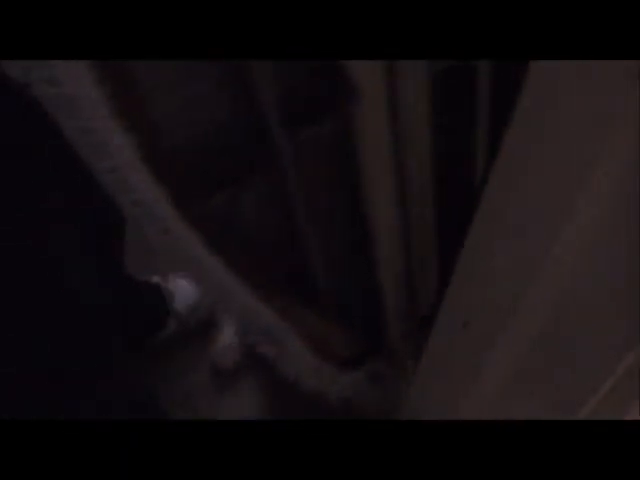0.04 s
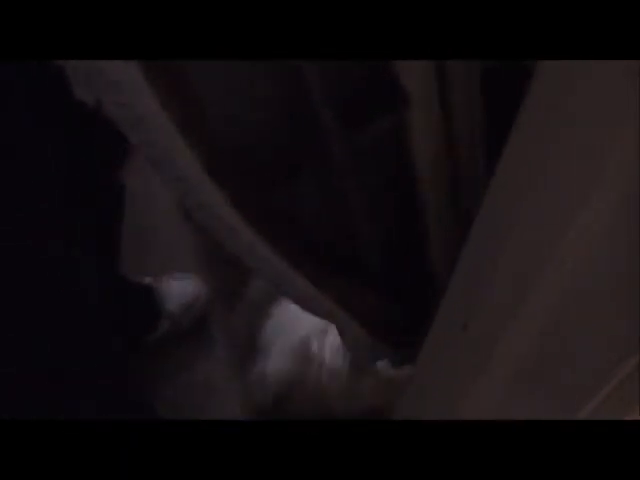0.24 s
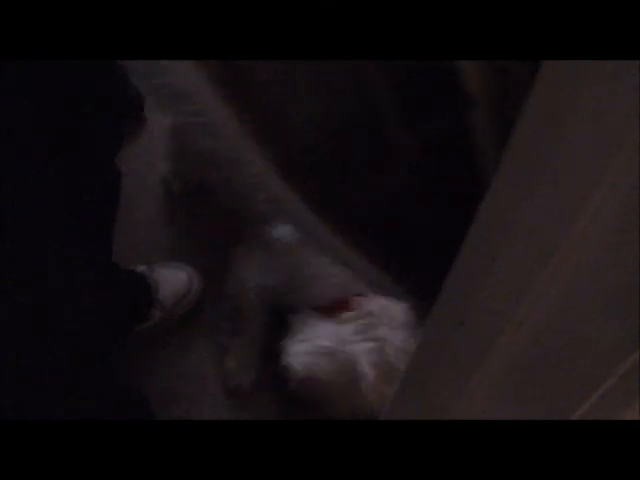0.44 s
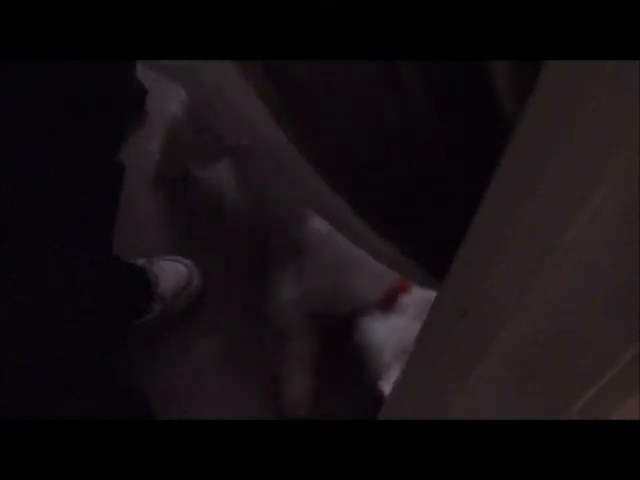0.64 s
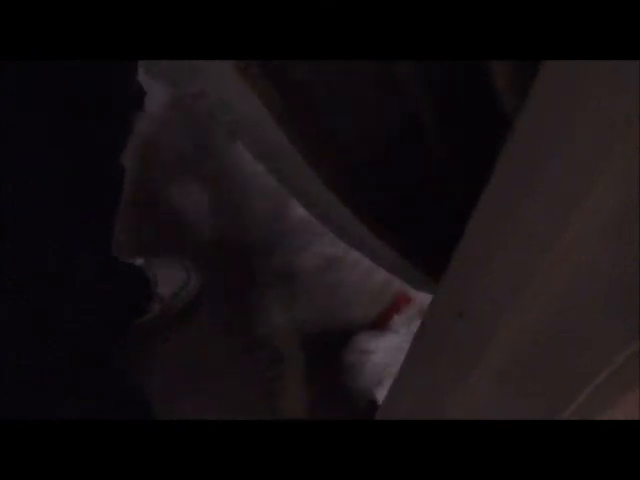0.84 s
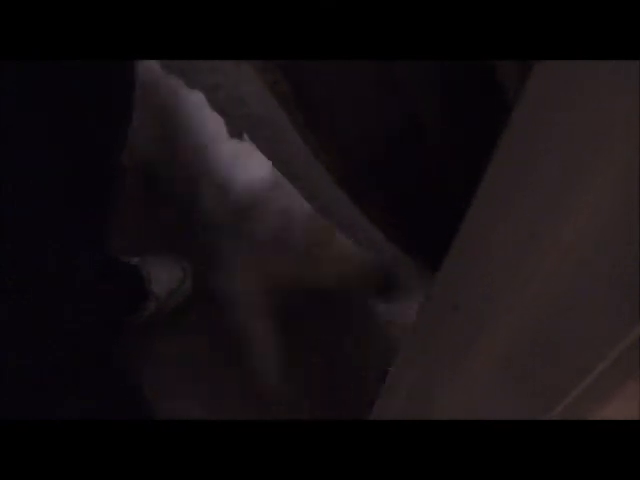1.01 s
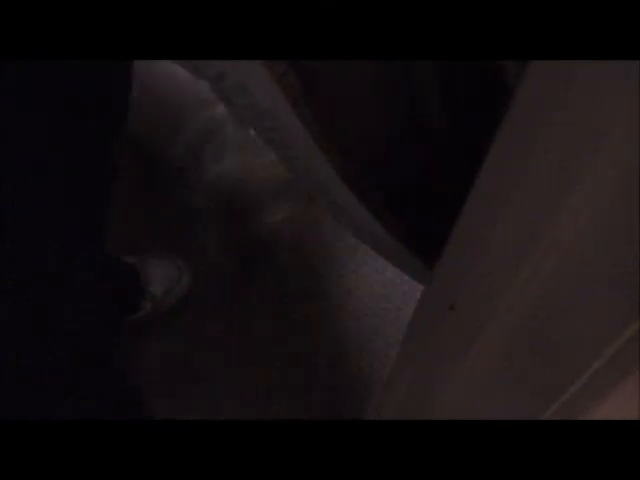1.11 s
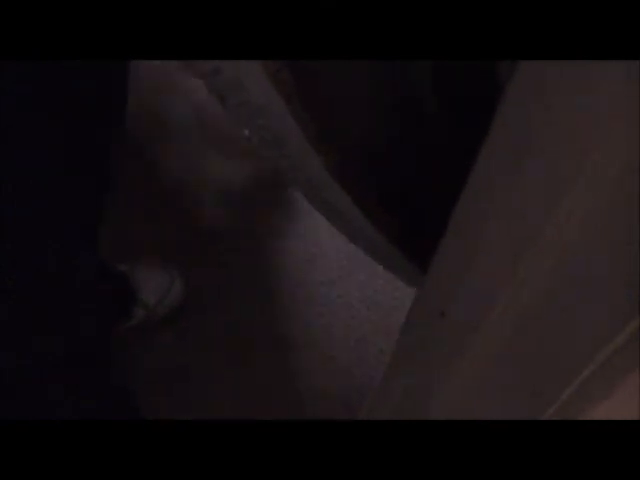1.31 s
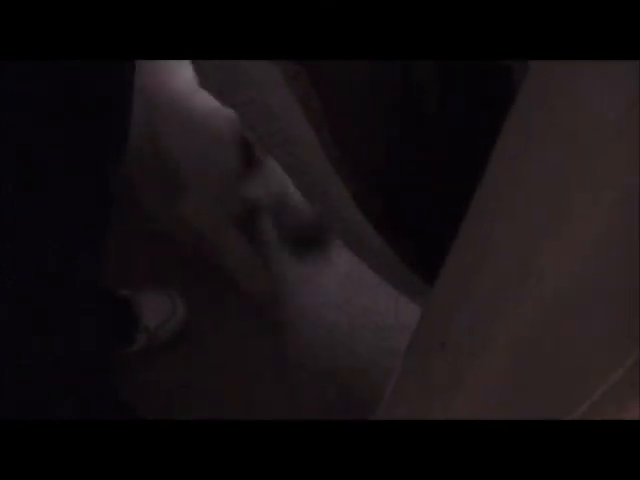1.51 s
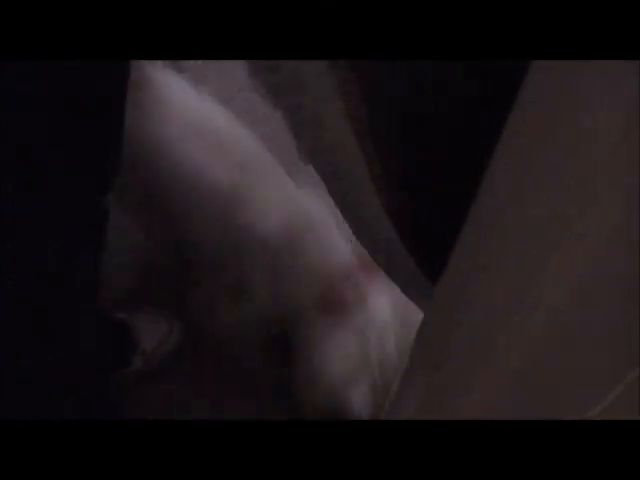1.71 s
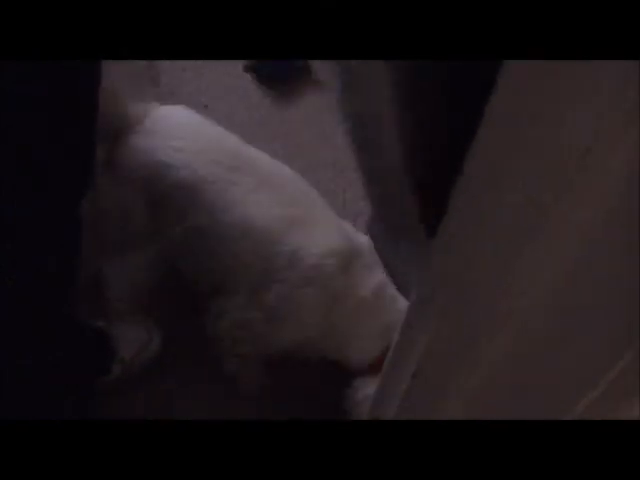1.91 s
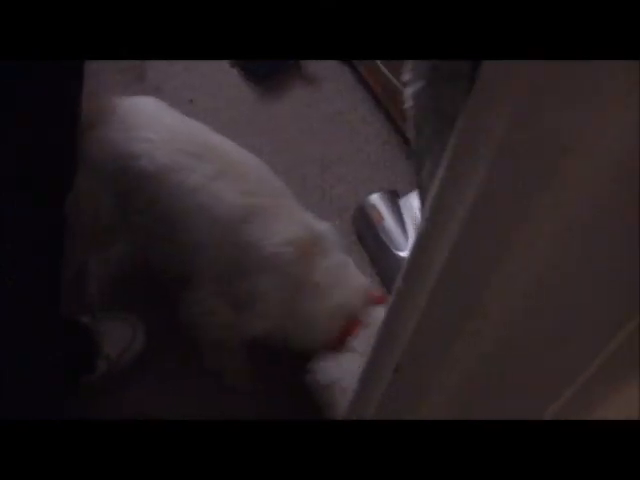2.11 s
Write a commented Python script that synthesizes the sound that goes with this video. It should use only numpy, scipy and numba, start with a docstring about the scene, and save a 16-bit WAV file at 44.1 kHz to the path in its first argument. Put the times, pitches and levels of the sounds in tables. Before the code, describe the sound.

A small dog growls, barks gruffly twice, then snarls raggedly while knocking and snapping at a board

```python
"""Small dog snarling in a small room

A small dog growls, breaks into two gruff barks, then into a long ragged snarl: pulses and rasping
air from the vocal folds ring through chest, throat and mouth, and air hisses through the teeth.
Once in the growl, then between the calls and after the last, it snaps and scrabbles at a board:
noise bursts knock the wood and crack at the contact, and two close tones ring on as a thin metal
part. A close microphone pair hears the near walls and a faint room tone."""
import sys
import numpy as np
from scipy import signal
from scipy.fft import rfft, irfft
from scipy.io import wavfile
from scipy.ndimage import uniform_filter1d, minimum_filter1d, map_coordinates
from numba import njit

SR = 44100
rng = np.random.default_rng(int(sys.argv[2]) if len(sys.argv) > 2 else 0)


def digitize_waveform(pressure):
    """Quantize a signal to 16-bit integers and store it at the path in sys.argv[1].

    Rows of a 2-D input are taken as channels; values are limited to [-1, 1].
    """
    field = np.atleast_2d(pressure).T
    bounded = np.clip(field, -1, 1)
    quanta = np.round(bounded * 32767).astype(np.int16)
    wavfile.write(sys.argv[1], SR, quanta)


N = 94815
T = np.arange(N) / SR  # seconds

# Noise of the quiet room. Each row: frequency in Hz, relative level in dB.
ROOM_TONE = [(25, -4), (55, -13), (90, -31), (160, -10.5), (400, -11.5), (1000, -14), (4000, -19),
             (15000, -32)]
ROOM_TONE_DB = -54

# The vocal folds. Each row: time in seconds, mean pitch in Hz, roughness from 0 to 1.
FOLDS = [(0, 227.6, 0.24), (.035, 268.9, 0.19), (.1, 250.3, 0.06), (.19, 259.2, 0.23), (.225, 298.4, .5),
         (.245, 380.9, 0), (.265, 399.8, 0.02), (.315, 368.6, 0.25), (.36, 261.5, 0.97), (.42, 279.1, 0.37),
         (.5, 297.8, 0.15), (.53, 307.3, 0.49), (.545, 383.2, 0.51), (.565, 441.8, 0.56),
         (.59, 481.6, 0.43), (.615, 588.7, 0.01), (.64, 556, 0.2), (.662, 497, 0.19), (.68, 319.3, 0.98),
         (.75, 208.6, 0.69), (1.14, 288.9, 0.93), (1.165, 314.4, 0.47), (1.19, 386.6, 0.48),
         (1.22, 403, 0.89), (1.245, 490.3, 0.66), (1.275, 526.8, 0.3), (1.298, 533.1, 0.35),
         (1.31, 393, 0.23), (1.33, 378.9, 0.21), (1.355, 343.8, 0.74), (1.41, 354.4, 0.83),
         (1.45, 342.3, 0.93), (1.48, 412.3, 0.32), (1.505, 471.5, 0.56), (1.53, 428.5, 0.91),
         (1.565, 371, 0.45), (1.6, 303.5, 0.99), (1.67, 307.4, 0.6), (1.71, 228.7, 0.69),
         (1.76, 189.8, 0.69)]
# All of these grow with roughness; rates are random points per second.
JITTER, FLUTTER_HZ, WOBBLE, WOBBLE_HZ = 0.07582, 219.1, .03, 70.49  # fast and slower pitch unrest
SHIMMER, HALF_TONE, RASP = 0.81, 0.34, 2  # pulse size unrest, octave-down beat, share of air
SECOND_FOLD, SECOND_RATIO = 0.41, 1.27  # share of the second fold, its pitch over the first
THROB_DB, THROB_HZ = 0.5, 74.4  # uneven loudness

# Growl and barks. Each row: time in seconds, then levels in dB, before the trims below, of the
# throat, the upper mouth, the low chest tone and the hiss.
BARKS = [(0.0, -26.5, -41, -25, -46), (0.01, -28.5, -46, -50, -61), (0.04, -24.5, -43, -32, -51),
         (0.1, -44, -49, -33.5, -56), (0.11, -31.5, -34.5, -36.5, -51), (0.142, -36.5, -55.5, -31.5, -56),
         (0.204, -38.5, -47.5, -35, -46), (0.232, -19, -30.5, -45, -45.5), (0.25, -14.5, -17.5, -31, -43.5),
         (0.274, -12.5, -27.5, -27, -53), (0.304, -28, -19, -35.5, -48), (0.338, -27.5, -59, -38, -48),
         (0.454, -31.5, -41, -30.5, -55), (0.49, -26.5, -37.5, -30, -55), (0.54, -23.5, -28.5, -28.5, -46),
         (0.566, -17.5, -13.5, -40.5, -40), (0.586, -15.5, -11, -77, -36), (0.596, -12.5, -16.5, -14, -34),
         (0.612, -14.5, -21.5, -74, -64), (0.628, -22.5, -37.5, -46, -51), (0.664, -16.5, -24.5, -24, -59),
         (0.688, -35.5, -50, -43.5, -52), (0.704, -45, -64, -31, -70), (0.712, -52, -57, -27.5, -56),
         (0.728, -65, -67, -45, -63), (0.8, -81, -79, -68, -61)]
# The long snarl. Each row: the same columns, in seconds and dB.
SNARL = [(1.12, -79, -98, -66, -80), (1.152, -29, -32, -57, -69), (1.166, -29, -38.5, -37.5, -54),
         (1.21, -18.5, -38.5, -35.5, -47.5), (1.238, -15.5, -28.5, -45, -46), (1.252, -37, -20, -43, -43),
         (1.288, -20, -22.5, -65, -54), (1.306, -20, -46, -36, -50.5), (1.33, -10.5, -21, -34.5, -49),
         (1.362, -28.5, -28, -42.5, -46.5), (1.39, -20, -27.5, -52, -49), (1.406, -20, -24, -64, -41),
         (1.44, -21, -45.5, -36.5, -49), (1.472, -18, -22, -60, -44), (1.488, -20.5, -20.5, -40, -42.5),
         (1.518, -20.5, -25, -49, -43), (1.554, -13, -35, -34, -46), (1.574, -14.5, -21.5, -57, -45.5),
         (1.614, -27, -34.5, -43.5, -49.5), (1.688, -26, -37, -41, -52.5), (1.736, -43, -43.5, -42, -50),
         (1.77, -65, -55, -73, -56)]
PAUSE_TIMES_S, PAUSE_DB = (.83, 1.1, 1.83), -85  # the voice falls nearly silent
THROAT_DB, MOUTH_DB, CHEST_DB, HISS_DB = -2.5, 0.5, -2.5, -0.5  # trims
# Jaw and lips. Each row: time in seconds, throat resonance in Hz, lip resonance in Hz.
JAW = [(0, 890, 1420), (.04, 1160, 1320), (.11, 1060, 1780), (.17, 920, 1360), (.225, 940, 1500),
       (.26, 1090, 2050), (.3, 890, 2024), (.33, 810, 1820), (.39, 1040, 1300), (.47, 864, 1410),
       (.55, 920, 1813), (.6, 1060, 1817), (.635, 660, 1840), (.67, 717, 1786), (.72, 686.3, 1760),
       (1.15, 726.6, 1640), (1.23, 930, 1430), (1.28, 696, 2020), (1.33, 765, 1440), (1.41, 906, 1709),
       (1.45, 710, 1600), (1.495, 1198, 1620), (1.525, 884.6, 1440), (1.57, 983.4, 1611), (1.62, 884, 1618),
       (1.76, 890.7, 1450)]
# Upper mouth resonances. Each row: frequency in Hz, width of one pass in Hz, level in dB before opening.
MOUTH = [(1577, 310, 3.5), (1918, 770, -5), (2482, 355, -4.5), (2870, 740, -15.5)]
OPEN_DB_PER_DB, OPEN_FROM_DB = 0.11, -48  # tilt per octave above the lowest, growing with mouth level
# Widths are of one pass; each resonance is applied twice.
THROAT_WIDTH_HZ, LIP_WIDTH_HZ, LIP_DB = 566, 465, 4
PHARYNX_HZ, PHARYNX_WIDTH_HZ, PHARYNX_DB = 583, 111, -6.5
CHEST_HZ, CHEST_WIDTH_HZ = 312.5, 141
# Skirts of the throat. Each row: frequency in Hz, gain in dB.
THROAT_SKIRTS = [(120, -30), (250, 2.5), (380, -11), (520, -2), (1400, 3), (3000, -15.5), (6000, 1)]
# Skirts of the mouth. Each row: frequency in Hz, gain in dB.
MOUTH_SKIRTS = [(300, -27), (1000, -41), (1500, 2.5), (3000, 7), (4200, -7), (9000, 11)]
# Air through the teeth. Each row: frequency in Hz, relative level in dB.
HISS = [(2500, -18.5), (4000, 1.5), (5500, 1), (7500, 0.5), (10000, -6), (15000, -10.5)]

# Blows on the board. Each row: start in seconds, wood level in dB and sharp crack level in dB,
# both before the trims, rise time in seconds, scrape decay in seconds.
KNOCKS = [(0.188, -32.5, -33, 0.0026, .012), (0.839, -30, -37.5, 0.0072, 0.019),
          (.86, -35, -21, 0.00033, 0.019), (.886, -49, -31, 0.00096, 0.0044),
          (.921, -24.5, -19, 0.00036, 0.0076), (1.018, -36, -55, 0.0018, 0.0081),
          (1.0717, -77, -40, 0.00028, 0.0038), (1.778, -114, -34.5, .0004, 0.0072),
          (1.8384, -28.5, -25.5, 0.00024, 0.0073), (1.8544, -25.5, -24, 0.00028, 0.0086),
          (1.867, -27, -32, .003, 0.021), (1.889, -25.5, -21.5, 0.00037, 0.0018),
          (1.905, -34, -39, .001, 0.0088), (1.918, -32.5, -52, 0.00081, 0.005),
          (1.966, -38, -43, 0.0045, 0.0098), (2.0835, -29, -32.5, 0.00046, .007),
          (2.115, -35.5, -62, 0.014, 0.017), (2.143, -51, -62, 0.00079, .01)]
# Modes of the board. Each row: frequency in Hz, width in Hz, relative level in dB.
BOARD_MODES = [(154, 29.3, -9), (359.1, 88, 3.5), (491, 150, 4), (672, 330, 1), (907, 180, 4),
               (1580, 420, -0.5), (2450, 1070, -6.5), (3780, 330, -4.5)]
# Colour of the crack. Each row: frequency in Hz, relative level in dB.
CRACK = [(800, -9), (2300, 11), (3600, 5), (4800, 5.5), (7500, 7), (11000, 1), (15500, -3)]
WOOD_DB, CRACK_DB, GRAIN = 3, -3.5, 0.19  # two trims, depth of the grain in the scrape
RING_HZ, RING_DB, RING_PAIR_DB, RING_T60_S = (5426, 5383), -31, -6, .65  # second tone rel. to first

# Ringing resonances of the room. Each row: frequency in Hz, width in Hz, level in dB.
ROOM_MODES = [(279.2, 7.3, -6), (382.4, 9.3, -9.5), (502, 40, -7), (601.2, 26.4, 2.5), (651, 24.8, 6),
              (772, 16, -7), (885, 19, -5.5), (1140, 8.6, -15), (1375, 50, 1), (1802, 24, -15.5),
              (1910, 58, -13)]
ROOM_T60_S, ROOM_TREBLE_T60_S, ROOM_DB = 0.27, 0.17, -8
WALL_S = 0.00371  # delay before the first reflection
# Side sound from the reflections. Each row: frequency in Hz, level in dB.
SPREAD = [(100, -57), (1000, -28.5), (2500, -11), (5000, -8), (15000, -13.5)]
# Where the dog sits between the microphones. Each row: frequency in Hz, left minus right in dB.
DOG_PAN = [(200, -4), (700, -5), (1400, -4), (2500, -0.5), (5000, 5), (15000, 1.5)]
# Where the board stands. Each row: frequency in Hz, left minus right in dB.
BOARD_PAN = [(200, -5.5), (1000, -4.5), (2500, -1.5), (5000, 3), (15000, 1.5)]
RIGHT_LAG_S = .000012  # the left microphone hears first
CEILING, TOP_HZ = .93, 15500  # limiter ceiling (1 is full scale), top of the recorder's band


def undb(db):
    """Decibels to amplitude."""
    return 10 ** (np.asarray(db) / 20)


def unit(x):
    """Scale to an RMS of one."""
    return x / np.sqrt(np.mean(x ** 2))


def steady(x, size=900):
    """Hold a sound at unit level, following its power over tens of milliseconds."""
    power = uniform_filter1d(uniform_filter1d(x * x, size), size)
    return x / np.sqrt(np.abs(power) + 1e-12)


def curves(rows):
    """Join each column of a table by straight lines in time."""
    when, *columns = np.array(rows, float).T
    return [np.interp(T, when, column) for column in columns]


def colour(x, points, power=1):
    """Filter by a (Hz, dB) table, with power scaling the dB."""
    hz, db = np.array(points, float).T
    f = np.maximum(np.arange(N + 1) * SR / (2 * N), 1)
    gain = undb(power * np.interp(np.log(f), np.log(hz), db))
    return irfft(rfft(x, 2 * N) * gain)[..., :N]


def walk(rate):
    """Join random values, rate of them per second, by straight lines."""
    return np.interp(T * rate, np.arange(N), rng.standard_normal(N))


@njit
def svf(x, hz, width):
    """State-variable band-pass with a moving centre."""
    y, b, l = np.empty(len(x)), 0., 0.
    for i in range(len(x)):
        g = np.tan(np.pi * hz[i] / SR)
        v = (b + g * (x[i] + 1e-18 - l)) / (1 + g * (g + width / hz[i]))
        b, l, y[i] = 2 * v - b, l + 2 * g * v, v * width / hz[i]
    return y


def band(x, hz, width):
    """One resonance, fixed or moving."""
    return svf(x, hz + np.zeros(N), float(width))


def steep(x, hz, width):
    """A resonance applied twice, for steeper skirts."""
    return band(band(x, hz, width), hz, width)


def room_tone():
    """Steady coloured noise, partly shared by the two microphones."""
    shared = rng.standard_normal(N)
    separate = rng.standard_normal((2, N))
    return undb(ROOM_TONE_DB) * unit(colour(shared + separate, ROOM_TONE))


def fold_phase(hz, rough):
    """Running phase of a fold whose pitch grows unsteady with roughness."""
    flutter = JITTER * rough * walk(FLUTTER_HZ)
    wobble = WOBBLE * np.sqrt(rough) * walk(WOBBLE_HZ)
    return 2 * np.pi * np.cumsum(hz * (1 + flutter + wobble)) / SR


def pulse_train(phase, count=16):
    """Harmonics in step add up to one pulse per cycle."""
    return unit(sum(np.cos(k * phase) / k ** 0.66 for k in range(1, count + 1)))


def folds():
    """Uneven pulses; with roughness come a half tone, a second fold out of step and a rasp of air."""
    hz, rough = curves(FOLDS)
    rough = np.clip(rough, 0, 1)
    phase = fold_phase(hz, rough)
    second = pulse_train(fold_phase(hz * SECOND_RATIO, rough))
    pulses = pulse_train(phase) + SECOND_FOLD * rough * second
    shimmer = np.exp(SHIMMER * rough * np.tanh(walk(170)))
    half_tone = 1 + HALF_TONE * rough * np.cos(phase / 2)
    air = rng.standard_normal(N) * (1 + 0.41 * np.cos(phase))  # puffs with each cycle
    voice = shimmer * half_tone * (pulses + RASP * rough * air)
    throb = undb(THROB_DB * rough * np.tanh(walk(THROB_HZ)))
    return voice, air, throb


def dog():
    """The folds drive chest, throat and mouth; air hisses through the teeth."""
    voice, air, throb = folds()
    pauses = [(t,) + 4 * (PAUSE_DB,) for t in PAUSE_TIMES_S]
    rows = sorted(list(map(tuple, BARKS)) + list(map(tuple, SNARL)) + pauses)
    throat_db, mouth_db, chest_db, hiss_db = curves(rows)
    throat_hz, lip_hz = curves(JAW)

    throat = steep(voice, throat_hz, THROAT_WIDTH_HZ)
    throat += undb(PHARYNX_DB) * steep(voice, PHARYNX_HZ, PHARYNX_WIDTH_HZ)
    mouth = undb(LIP_DB) * steep(voice, lip_hz, LIP_WIDTH_HZ)
    opening = OPEN_DB_PER_DB * (mouth_db - OPEN_FROM_DB)
    for hz, width, db in MOUTH:
        octaves = np.log2(hz / MOUTH[0][0])
        mouth += undb(db + opening * octaves) * steep(voice, hz, width)
    chest = steep(voice, CHEST_HZ, CHEST_WIDTH_HZ)

    sound = steady(colour(throat, THROAT_SKIRTS)) * undb(throat_db + THROAT_DB)
    sound += steady(colour(mouth, MOUTH_SKIRTS)) * undb(mouth_db + MOUTH_DB)
    sound += steady(chest) * undb(chest_db + CHEST_DB)
    sound += unit(colour(air, HISS)) * undb(hiss_db + HISS_DB)
    return throb * sound


def wood_body(x):
    """The board's modes ring side by side, with alternating sign."""
    return sum((-1) ** k * undb(db) * band(x, hz, w) for k, (hz, w, db) in enumerate(BOARD_MODES))


def metal_ring(power):
    """Two close tones beat together as a thin metal part, following the given power."""
    tones = 0
    for hz, gain in zip(RING_HZ, (1, undb(RING_PAIR_DB))):
        tones = tones + gain * np.sin(2 * np.pi * (hz * T + rng.random()))
    return np.sqrt(power) * tones


def board():
    """Teeth and claws hit and scrape: the wood rings, the contact cracks, a metal part sings on."""
    push, scrape, ring_power = np.zeros((3, N))
    for start, wood_db, crack_db, rise, decay in KNOCKS:
        age = np.maximum(T - start, 0)
        contact = (1 - np.exp(-age / rise)) * np.exp(-age / decay)
        push += undb(wood_db) * contact
        scrape += undb(crack_db) * contact
        ring_fade = np.exp(-np.log(1000) * age / RING_T60_S)
        ring_power += (age > 0) * (undb(crack_db) * ring_fade) ** 2
    ring = metal_ring(ring_power)
    grit = unit(rng.standard_normal(N) * np.exp(GRAIN * walk(900)))
    # Divide by the level of steady grit, so that the blows alone set the loudness.
    wood = wood_body(grit * push) / np.std(wood_body(grit))
    crack = colour(grit * scrape, CRACK) / np.std(colour(grit, CRACK))
    return undb(WOOD_DB) * wood + undb(CRACK_DB) * crack + undb(RING_DB) * ring


def room(x):
    """Dense reflections from near walls; the treble dies first."""
    noise = rng.standard_normal(N)
    low = signal.sosfilt(signal.butter(2, 3000, fs=SR, output="sos"), noise)
    low_tail = low * 1000 ** (-T / ROOM_T60_S)
    treble_tail = (noise - low) * 1000 ** (-T / ROOM_TREBLE_T60_S)
    tail = (low_tail + treble_tail) * (T > WALL_S)
    return signal.fftconvolve(x, tail / np.sqrt(np.sum(tail ** 2)))[:N]


def place(x, pan):
    """Direct sound, room resonances and reflections at a close pair of microphones."""
    x = x + sum(undb(db) * band(x, hz, width) for hz, width, db in ROOM_MODES)
    mid = x + undb(ROOM_DB) * room(x)
    side = colour(room(x), SPREAD)
    right = map_coordinates(mid - side, [(T - RIGHT_LAG_S) * SR], mode="nearest")
    return np.array([colour(mid + side, pan, 1 / 2), colour(right, pan, -1 / 2)])


def scene():
    """Dog and board, each at its own place in the room, over the room tone."""
    return room_tone() + place(dog(), DOG_PAN) + place(board(), BOARD_PAN)


def record(dry, size=300):
    """A fast limiter holds the peaks under full scale; the recorder cuts the top."""
    needed = np.minimum(1, CEILING / (np.abs(dry).max(axis=0) + 1e-9))
    gain = uniform_filter1d(minimum_filter1d(needed, size), size)
    top_cut = signal.ellip(8, .2, 70, TOP_HZ, fs=SR, output="sos")
    return signal.sosfilt(top_cut, dry * gain)


dry = scene()
out = record(dry)
digitize_waveform(out)
```